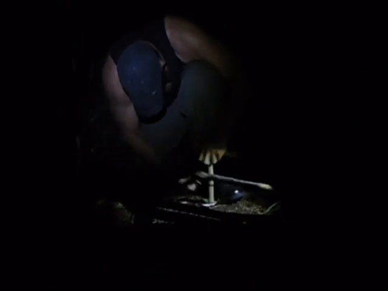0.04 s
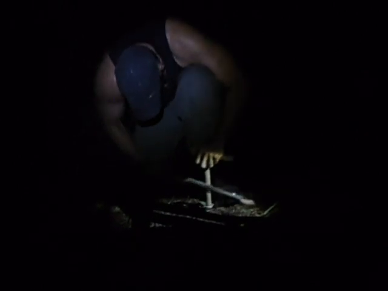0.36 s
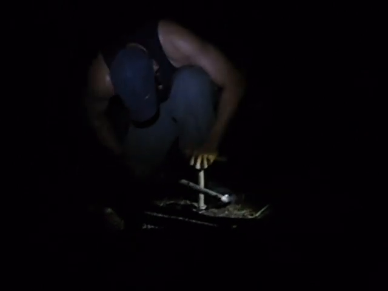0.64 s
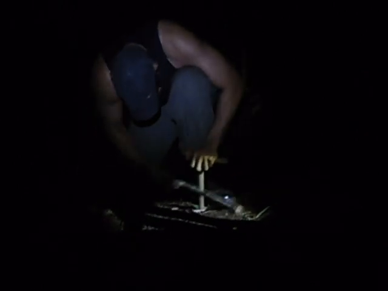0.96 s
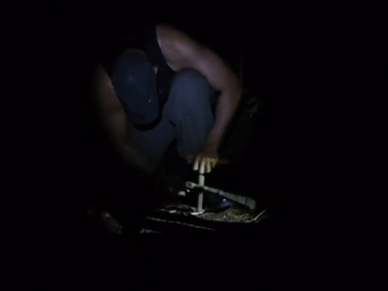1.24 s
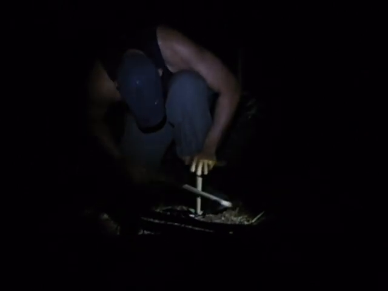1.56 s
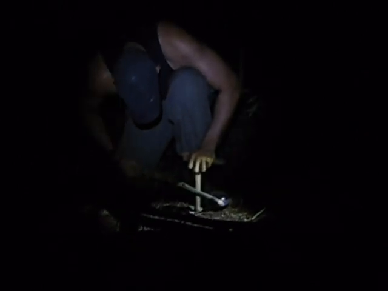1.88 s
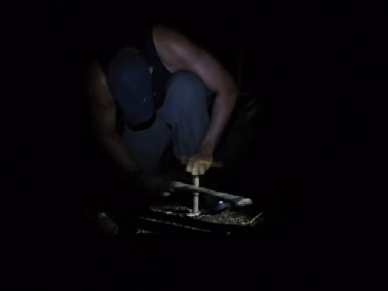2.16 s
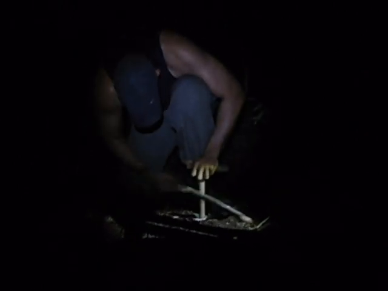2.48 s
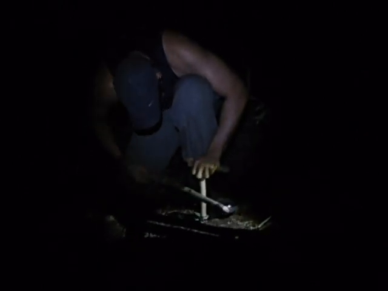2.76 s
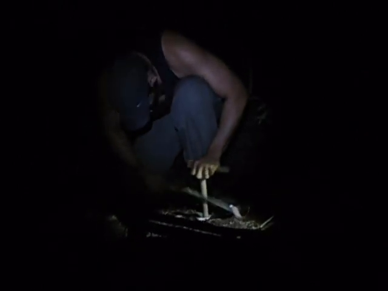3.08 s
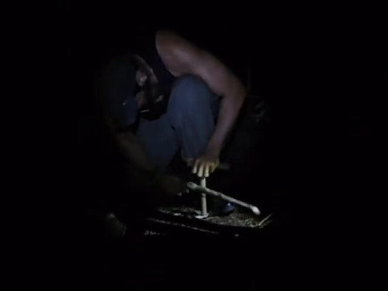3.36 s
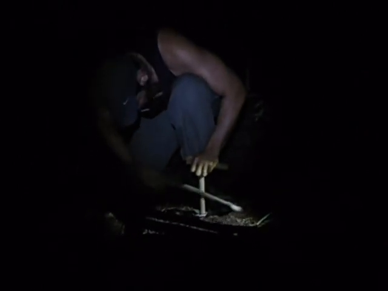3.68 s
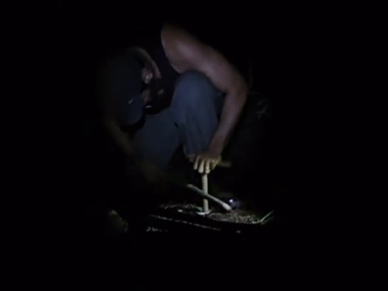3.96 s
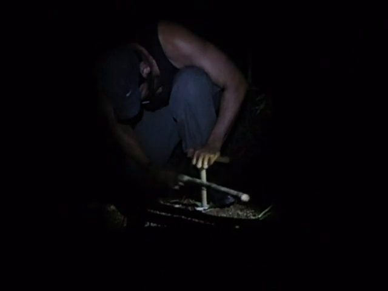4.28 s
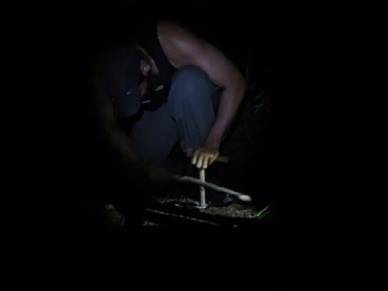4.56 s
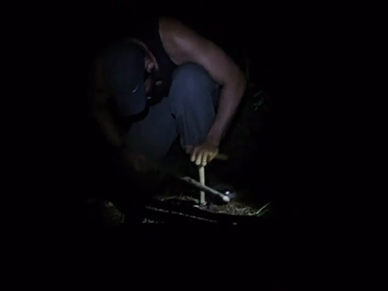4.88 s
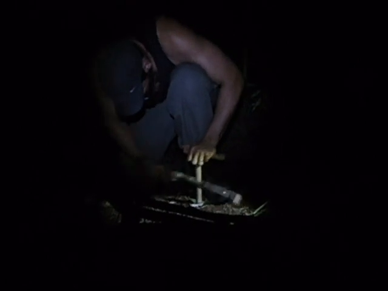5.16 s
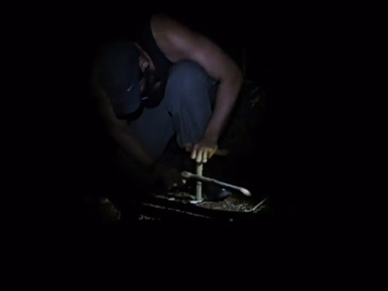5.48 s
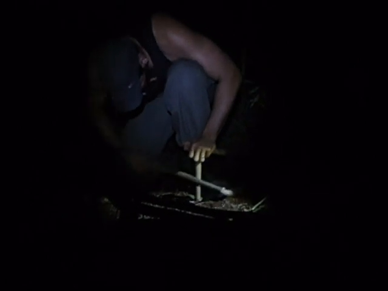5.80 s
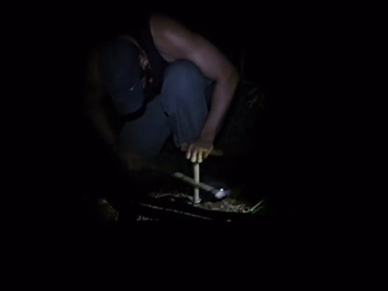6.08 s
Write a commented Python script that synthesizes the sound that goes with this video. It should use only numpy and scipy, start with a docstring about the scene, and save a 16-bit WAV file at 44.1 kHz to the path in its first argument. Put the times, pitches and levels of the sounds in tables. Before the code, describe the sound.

Short, high wooden squeaks, dry rubbing and light knocks from a bow drill close by, building into longer squeals and croaks.

```python
"""Bow drill in the night woods

One microphone, close to a bow drill worked at a little over two round trips a second. The wooden spindle
sticks and slips in its socket in short squeaks; under load it drops an octave and croaks. The tip rubs
dryly, the spindle knocks as the bow turns round, and farther off the trees answer over the still night.
A low-rate recorder adds a metallic sheen."""
import sys
import numpy as np
from scipy import signal
from scipy.fft import rfft, irfft, next_fast_len
from scipy.io import wavfile
from scipy.ndimage import uniform_filter1d, minimum_filter1d, map_coordinates

SR = 44100
rng = np.random.default_rng(int(sys.argv[2]) if len(sys.argv) > 2 else 0)


def materialize(psi):
    """Save the field psi as 16-bit PCM at rate SR to the path in sys.argv[1].

    A 1-D psi becomes a single channel; in a 2-D psi each row is a channel.
    """
    bounded = np.clip(np.atleast_2d(psi).T, -1, 1)
    quanta = np.round(bounded * 32767).astype(np.int16)
    wavfile.write(sys.argv[1], SR, quanta)


N = 270333
T = np.arange(N) / SR
TURN_S, ROUND_TRIP_S = 0.381, 0.4178  # an outward stroke starts at this moment and once every round trip

# How the wood radiates the squeaks. Each row: frequency in Hz, gain in dB.
BOARD_RESPONSE = [(300, -10), (550, 2), (850, -7), (1250, -0.5), (1450, -6.5), (1700, 7), (1830, 1),
                  (1980, -2), (2200, -4), (3050, 2), (3350, -4), (3650, -3), (3950, -1.5), (4300, -4.5),
                  (4700, -4), (5200, 5)]

def squeak(jitter=0.0125, croak_jitter=0.021, shimmer_rad=0.11, smear_rad=0.59, flutter_db=4.5):
    """The spindle sticks and slips; alternating strong and weak slips add lines between the harmonics."""
    hz, (fundamental, octave, croak, rasp) = slip_controls()
    load = croak / (croak + fundamental + octave + 1e-9)
    hz = hz * (1 + (jitter + croak_jitter * load) * wobble(450))  # uneven grain makes the slips uneven
    phase = 2 * np.pi * np.cumsum(hz) / SR
    low_halves = np.sqrt(croak * rasp) * amp(-6)
    third = rasp * amp(-3.5)
    high_halves = third * amp(-5)
    fourth = third * amp(-2) * np.sqrt(load)  # the highest partials need a heavy load
    partials = [(0.5, croak), (1, fundamental), (1.5, low_halves), (2, octave), (2.5, low_halves),
                (3, third), (3.5, high_halves), (4, fourth), (4.5, high_halves * load)]
    tone = np.zeros(N)
    for ratio, strength in partials:
        flutter = amp(flutter_db * wobble(220))
        scatter = (shimmer_rad + smear_rad * load) * wobble(600)  # load blurs the high partials most
        tone += np.sqrt(2) * strength * flutter * np.sin(ratio * (phase + scatter))
    grit = noise([(300, -14), (700, 0), (2000, -1), (5300, 0)])
    grit *= 1 + np.cos(phase / 2)  # every second slip tears fibres
    tearing = amp(-1) * rasp * np.sqrt(load + 0.19) + amp(-21) * fundamental  # light squeaks stay clear
    return filtered(tone + tearing * grit, lambda f: amp(along(BOARD_RESPONSE, f)))


def slip_controls():
    """Slip rate and strengths of fundamental, octave, croak and rasp; the louder squeak leads in pitch."""
    weight, weighted_hz, power = np.full(N, 1e-20), np.zeros(N), np.zeros((4, N))
    for near, hz, gain, octave_db, croak_db, rasp_db in [*chirps(), *squeals()]:
        fundamental = gain / np.hypot(1, amp(octave_db))
        strengths = [fundamental, fundamental * amp(octave_db), gain * amp(croak_db), gain * amp(rasp_db)]
        power[:, near] += np.square(strengths)
        weight[near] += gain ** 2
        weighted_hz[near] += gain ** 2 * hz
    return weighted_hz / weight, np.sqrt(power)


# Short chirps from the socket. Each row: centre in seconds, length in seconds, slip rate in Hz,
# relative level in dB, octave against the fundamental in dB, rasp against the level in dB.
SOCKET_CHIRPS = [(0.096, 0.0076, 1568, -32, -3.5, -20), (0.25, .0065, 1468, -27, -7, -11.5),
                 (0.264, 0.015, 1382, -16.5, 2.5, -6), (0.294, 0.029, 1394, -31, -10.5, -25),
                 (0.6812, .012, 1380, -17, 1.5, -10.5), (.697, .025, 1356, -31, 0, -20),
                 (.726, 0.015, 1368, -27.5, 3.5, -17.5), (.865, .013, 1547, -27.5, 7, -15),
                 (0.904, 0.03, 1547, -34.5, 0.5, -14), (0.938, .013, 1630, -38, -2, -28),
                 (1.089, .014, 1449, -16, -3, -10.5), (1.129, 0.028, 1434, -22, 0, -13.5),
                 (1.3204, .014, 1569, -27.5, 13.5, -22), (1.512, .012, 1262, -26, -5, -11),
                 (1.534, .017, 1236, -33.5, -24, -25), (1.556, .012, 1239, -29, -8.5, -32),
                 (1.7096, .023, 1614, -32.5, 5, -23.5), (1.7417, .013, 1644, -16, 10, -18.5),
                 (1.752, 0.016, 1615, -28, -12, -19), (1.9234, 0.012, 1401, -15, 1.5, -13.5),
                 (1.969, 0.017, 1404, -20, 5, -16), (2.3344, 0.0075, 1546, -19.5, 0, -22.5),
                 (2.351, .018, 1459, -34, -4, -11), (2.378, .02, 1437, -17.5, 0.5, -13.5),
                 (2.574, 0.013, 1487, -25, -5.5, -23.5), (2.6096, 0.013, 1570, -16, 2, -12),
                 (2.7684, .015, 1316, -28, -9, -20.5), (2.778, .005, 1426, -20.5, 0.5, -22),
                 (2.817, .017, 1261, -33.5, -13, -28), (3.0162, 0.0089, 1464, -33, -10, -30),
                 (3.178, 0.017, 1394, -16.5, 1.5, -15.5), (3.438, 0.016, 1647, -17.5, 13, -13.5),
                 (3.8132, 0.016, 1557, -27.5, -0.5, -23), (4.233, 0.018, 1497, -42, 19.5, -12),
                 (4.277, 0.021, 1575, -25.5, 26, -40), (4.661, .015, 1516, -17.5, 26, -24.5),
                 (4.7046, 0.016, 1538, -20.5, 16, -25), (5.243, .012, 1339, -27, -6, -12.5),
                 (5.511, 0.017, 1588, -15.5, 28, -28), (5.5412, 0.0036, 1698, -16.5, 14.5, -9.5),
                 (5.5515, .016, 1591, -12, 22, -26), (6.1227, 0.017, 1437, -21, -7, -17)]

def chirps(mean_glide_hz=-14.5, glide_spread_hz=95):
    """The spindle catches for a moment: a quick swell and fade while the pitch slides up or down."""
    glides = mean_glide_hz + glide_spread_hz * rng.standard_normal(len(SOCKET_CHIRPS))
    for (centre, length, hz, db, octave_db, rasp_db), glide_hz in zip(SOCKET_CHIRPS, glides):
        near = slice(max(int((centre - 3 * length) * SR), 0), int((centre + 3 * length) * SR))
        offset = (T[near] - centre) / length
        swell = bell(offset, width=np.where(offset < 0, 0.88, 1.08))
        sliding_hz = hz + glide_hz * np.clip(offset, -0.5, 0.5)
        _, _, croak_db = timbre(hz)
        yield near, sliding_hz, amp(db) * swell, octave_db, croak_db, rasp_db


# Drawn-out squeals, one curve each. Each row of a curve: time in seconds, slip rate in Hz,
# relative level in dB, half-pitch croak against the level in dB.
SQUEAL_CURVES = [
    [(3.572, 1042, -52, 3), (3.578, 1078, -42.5, -1.5), (3.59, 1135, -26, 0.5), (3.6, 1119, -33.5, 1.5),
     (3.608, 1138, -48.5, 5)],
    [(3.615, 1241, -43, -6), (3.623, 1244, -23, -10), (3.639, 1252, -30, -3), (3.651, 1252, -28, 1),
     (3.665, 1254, -59, 2)],
    [(3.84, 1620, -25, -21.5), (3.844, 1608, -15.5, -37), (3.85, 1579, -7, -44), (3.86, 1541, -16.5, -24),
     (3.88, 1635, -27.5, -8), (3.89, 1711, -27.5, -13), (3.902, 1764, -34, -14.5)],
    [(4.002, 1425, -34, -15), (4.008, 1390, -17, -16), (4.016, 1354, -19, -11), (4.03, 1137, -20.5, -3.5),
     (4.036, 1114, -17.5, -2.5), (4.05, 1290, -17.5, -8), (4.06, 1360, -23.5, -6.5),
     (4.076, 1259, -29.5, -1), (4.086, 1293, -30.5, -13), (4.1, 1310, -43, -10.5)],
    [(4.426, 1401, -37.5, -13.5), (4.432, 1373, -18.5, -16.5), (4.44, 1301, -18, -10),
     (4.452, 1114, -28.5, -0.5), (4.46, 1032, -18, -2), (4.466, 1165, -20.5, -3), (4.472, 1288, -28, -1.5),
     (4.476, 1300, -21.5, -8), (4.498, 1310, -22.5, -12), (4.52, 1256, -44, -6.5)],
    [(4.85, 1379, -28, 1), (4.86, 1341, -19, -27.5), (4.87, 1298, -25.5, -27)],
    [(4.873, 1319, -24.5, -27), (4.881, 1293, -18, -45.5), (4.893, 1298, -20.5, -47),
     (4.923, 1311, -30, -12.5), (4.93, 1313, -37, -9.5)],
    [(5.062, 1620, -42.5, -22), (5.07, 1611, -12.5, -31), (5.087, 1596, -13.5, -25)],
    [(5.096, 1594, -13.5, -17), (5.11, 1571, -3, -23.5), (5.13, 1547, -9.5, -29.5),
     (5.144, 1724, -14.5, -26), (5.156, 1760, -23.5, -28.5), (5.17, 1723, -38, -34)],
    [(5.275, 1362, -32.5, -3), (5.283, 1323, -24, -9.5), (5.291, 1245, -19.5, -13),
     (5.297, 1218, -29.5, -8.5)],
    [(5.301, 1172, -23.5, -21), (5.309, 1166, -24.5, -21), (5.319, 1226, -21.5, -18.5),
     (5.331, 1256, -24.5, -27), (5.345, 1240, -38.5, -10)],
    [(5.692, 1524, -30, -30), (5.7, 1443, -14.5, -40), (5.708, 1327, -27.5, -17.5), (5.72, 1162, -19.5, -5),
     (5.724, 1260, -26, -1.5)],
    [(5.728, 1442, -36.5, -6), (5.732, 1516, -31, -8), (5.736, 1486, -21.5, -12), (5.75, 1282, -32.5, -6),
     (5.758, 1290, -30, -10), (5.772, 1261, -38, -3.5)],
    [(5.919, 1706, -22, -34), (5.925, 1693, -15, -31), (5.941, 1672, -13.5, -32),
     (5.953, 1522, -14.5, -22.5), (5.965, 1679, -10.5, -15.5), (5.979, 1610, -15.5, -32),
     (5.995, 1558, -29.5, -23)],
]

def squeals(gain_db=-1.5, catch_s=0.003, release_s=0.0033):
    """The hand bears down: the spindle catches, squeals or croaks along its curve and lets go."""
    for curve in SQUEAL_CURVES:
        times, *columns = np.transpose(curve)
        near = (T > times[0]) & (T < times[-1] + 10 * release_s)
        t = T[near]
        hz, db, croak_db = (np.interp(t, times, column) for column in columns)
        catch = 1 - np.exp(-((t - times[0]) / catch_s) ** 2)
        release = np.exp(-np.maximum(t - times[-1], 0) / release_s)
        octave_db, rasp_db, _ = timbre(hz)
        yield near, hz, amp(db + gain_db) * catch * release, octave_db, croak_db, rasp_db


# The spindle's tone. Each row: slip rate in Hz, a squeal's octave against its fundamental in dB,
# a squeal's rasp against its level in dB, a chirp's croak against its level in dB.
SLIP_TIMBRE = [(1110, -3, -7, -19), (1291.4, -7.5, -8, -33), (1434, -3.5, -10, -23.5),
               (1569, 14, -15.5, -30), (1678.5, 7, -11, -39), (1763, -2.5, -14, -40)]

def timbre(hz):
    """Slow slips are raspy; near 1560 Hz the octave meets a resonance of the spindle and rings clear."""
    rates, *columns = np.transpose(SLIP_TIMBRE)
    return [np.interp(hz, rates, column) for column in columns]


# The spindle jumps in its socket. Each row: start in seconds, relative level in dB, tick offset in dB.
HARD_KNOCKS = [(.216, -28.5, -17), (.804, -29.5, -18), (2.549, -24.5, -11), (2.732, -24, -4.5),
               (2.902, -32, -18), (3.311, -23, -6.5), (3.724, -20.5, 0), (4.201, -26.5, -6),
               (4.525, -24, -22), (4.564, -22.5, 2), (4.614, -22.5, -10), (4.999, -33, -20),
               (5.055, -28, -2), (5.404, -26, -15), (5.466, -25, -16), (5.495, -26.5, 1.5),
               (5.778, -21, -3.5), (5.904, -23.5, 4.5)]
# Resonances of the knocked wood. Each row: frequency in Hz, width in Hz, gain in dB.
WOOD_MODES = [(522, 116, 1.5), (1000, 110, 2.5), (1720, 940, -5.5), (2220, 710, -10.5)]

def knocks(rise_s=0.001, body_t60=0.04, tick_t60=0.028, body_db=-8, tick_db=-6):
    """Wood chatters briefly on wood, close by: a hollow body and a dry tick."""
    body, tick = np.zeros(N), np.zeros(N)
    for start, db, treble_db in [*HARD_KNOCKS, *turn_knocks()]:
        near = slice(int(start * SR), int(start * SR) + SR // 10)
        t = T[near] - T[near][0]
        onset = amp(db) * (1 - np.exp(-t / rise_s))
        body[near] += onset * amp(-60 * t / body_t60)
        tick[near] += onset * amp(treble_db - 60 * t / tick_t60)

    def wood(f):
        return sum((-1) ** k * amp(db) * 1j * f * width / (hz ** 2 - f ** 2 + 1j * f * width)
                   for k, (hz, width, db) in enumerate(WOOD_MODES))

    hollow = unit(filtered(rng.standard_normal(N), wood))
    bright = noise([(800, -33), (2000, -14.5), (2900, 14.5), (3600, -1.5), (5300, -8)])
    return amp(body_db) * body * hollow + amp(tick_db) * tick * bright


def turn_knocks(level_db=-30.5, scatter_db=4, treble_db=-12.5, rebound_s=0.051, rebound_db=-9):
    """The spindle tips over in its socket as each outward stroke starts, then rocks back."""
    turns = np.arange(TURN_S, T[-1], ROUND_TRIP_S)
    levels = level_db + scatter_db * rng.standard_normal(len(turns))
    hard_starts = np.transpose(HARD_KNOCKS)[0]
    for turn, turn_db in zip(turns, levels):
        for start, db in [(turn, turn_db), (turn + rebound_s, turn_db + rebound_db)]:
            # a hard knock within 25 ms takes the soft one's place
            if start < T[-1] and np.abs(hard_starts - start).min() > 0.025:
                yield start, db, treble_db


# The dry rub at the tip. Each row: frequency in Hz, relative noise density in dB.
RUB_SPECTRUM = [(100, -18.5), (350, -1.5), (600, 0.5), (900, -8), (1400, 3), (2200, -10), (2950, 4.5),
                (3600, -8), (5300, -3.5)]

def rubbing(out_db=-46, back_db=-46.5, growth_db_per_s=0.8, creep=0.063, grain_db=3, spin_db=-0.5):
    """The tip grinds charred dust: loudest in mid-stroke, faint when the bow turns, uneven as it spins."""
    swing = np.sin(np.pi * stroke())
    speed = creep + (1 - creep) * np.abs(swing)
    outward = (1 + swing) / 2
    push_db = out_db + growth_db_per_s * T  # the hand bears down more and more
    pressure_db = outward * push_db + (1 - outward) * back_db + 0.8 * wobble(5.19)
    dust = unit(noise(RUB_SPECTRUM) * amp(grain_db * wobble(700) + spin_db * wobble(41)))
    return amp(pressure_db) * speed * dust


# The low scuff. Each row: frequency in Hz, relative noise density in dB.
SCUFF_SPECTRUM = [(120, -21.5), (250, -8), (360, -6), (500, -17.5), (900, -18), (3000, -38)]

def scuffs(delay_s=0.09, length_s=0.049, level_db=-54):
    """Early in each outward stroke comes a short, soft swell of low friction noise."""
    from_peak = (T - TURN_S - delay_s + ROUND_TRIP_S / 2) % ROUND_TRIP_S - ROUND_TRIP_S / 2
    return amp(level_db) * bell(from_peak, length_s) * noise(SCUFF_SPECTRUM)


# The woods around the microphone. Each row: frequency in Hz, time to die away by 60 dB in seconds.
WOODS_DECAY = [(200, 0.76), (700, 0.14), (1500, 0.34), (3100, 0.3), (4300, 0.38), (5500, 0.26)]

def tree_echoes(drill, delay_s=0.016, build_s=0.00033, paths=5):
    """Scattered echoes from the trunks build up, then die at a speed that depends on frequency."""
    hz, t, spectra = signal.stft(rng.standard_normal((paths, SR * 3 // 4)), SR, nperseg=256)
    swell = 1 - np.exp(-np.maximum(t - delay_s, 0) / build_s)
    decay = amp(-60 * t / along(WOODS_DECAY, hz)[:, None])
    _, tails = signal.istft(spectra * swell * decay, SR, nperseg=256)
    tails /= np.linalg.norm(tails, axis=1, keepdims=True)
    # the crouching body sways with the bow, so each stroke meets another set of echo paths
    path = np.floor(stroke()) % paths
    return sum(signal.fftconvolve(drill * (path == k), tail)[:N] for k, tail in enumerate(tails))


# The background of the woods at night. Each row: frequency in Hz, relative noise density in dB.
NIGHT_SPECTRUM = [(15, 2), (40, -3.5), (100, -2.5), (250, -3.5), (500, -12.5), (1000, -10.5), (2500, -18),
                  (5400, -16.5)]

def night(level_db=-53):
    """A faint, steady hush behind the drill."""
    return amp(level_db) * noise(NIGHT_SPECTRUM)


def stroke():
    """Strokes of the bow so far, per sample: even ones go out, odd ones come back."""
    return 2 * (T - TURN_S) / ROUND_TRIP_S


def amp(db):
    """Decibels to gain."""
    return 10 ** (np.asarray(db) / 20)


def unit(x):
    """Scale to rms 1."""
    return x / np.sqrt(np.mean(x ** 2) + 1e-20)


def bell(offset, width):
    """A bell-shaped swell that peaks at offset 0."""
    return np.exp(-(2 * offset / width) ** 2)


def along(points, hz):
    """(Hz, value) points read on a log frequency axis."""
    frequencies, values = np.transpose(points)
    return np.interp(np.log(hz + 1), np.log(frequencies), values)


def wobble(rate):
    """A smooth random curve, rate knots a second."""
    return map_coordinates(rng.standard_normal(int(N * rate / SR) + 4), [T * rate])


def filtered(x, response):
    """Pass x through a complex response of frequency."""
    size = next_fast_len(N + SR // 2)
    return irfft(rfft(x, size) * response(np.fft.rfftfreq(size, 1 / SR)), size)[:N]


def noise(spectrum):
    """Noise of rms 1, coloured by (Hz, dB) points."""
    return unit(filtered(rng.standard_normal(N), lambda hz: amp(along(spectrum, hz))))


def scene(echo_db=-17):
    """At the microphone, in mono: the drill close by, its echo among the trees and the still night."""
    drill = squeak() + knocks() + rubbing() + scuffs()
    return (drill + amp(echo_db) * tree_echoes(drill) + night())[None]


def record(dry, band_hz=5300, ceiling=0.87, hold_samples=4, top_hz=15850):
    """The recorder limits peaks and holds samples at a quarter rate, mirroring squeaks into the treble."""
    band = filtered(dry[0], lambda hz: 1 / np.sqrt(1 + (hz / band_hz) ** 60))
    needed_gain = np.minimum(1, ceiling / (np.abs(band) + 1e-9))
    smooth_gain = uniform_filter1d(minimum_filter1d(needed_gain, size=130), size=130)
    held = np.repeat((smooth_gain * band)[::hold_samples], hold_samples)[:N]
    return filtered(held, lambda hz: hz < top_hz)[None]


dry = scene()
out = record(dry)
materialize(out)
```